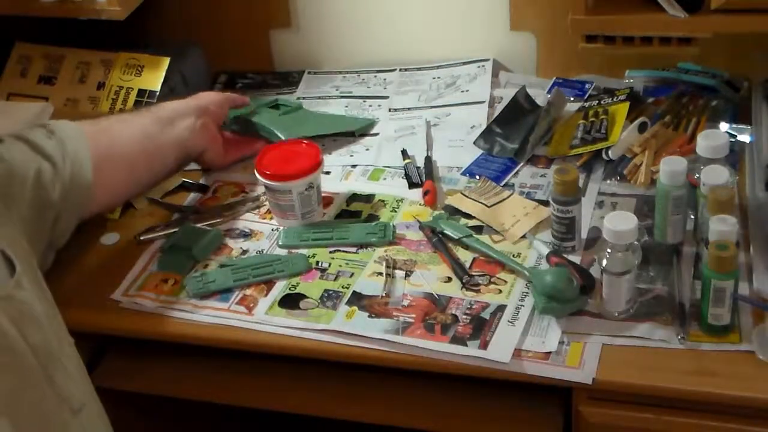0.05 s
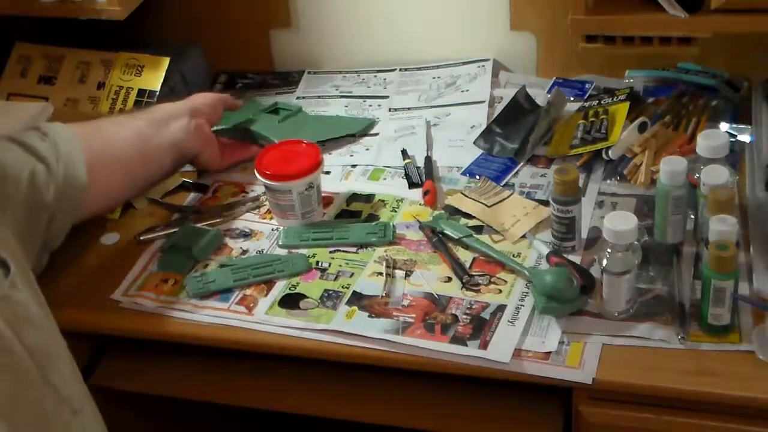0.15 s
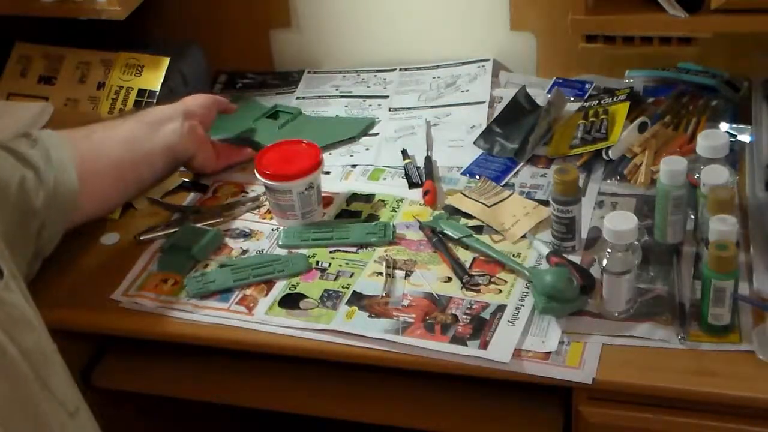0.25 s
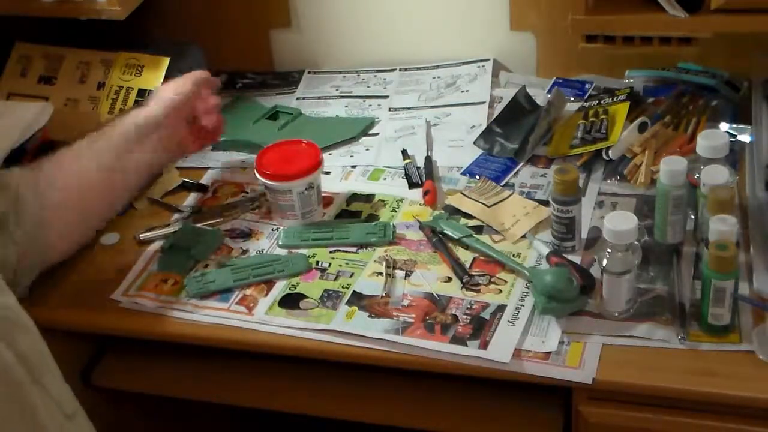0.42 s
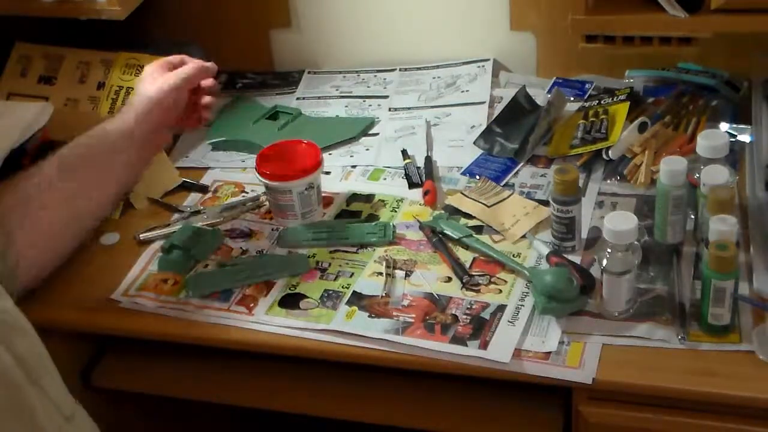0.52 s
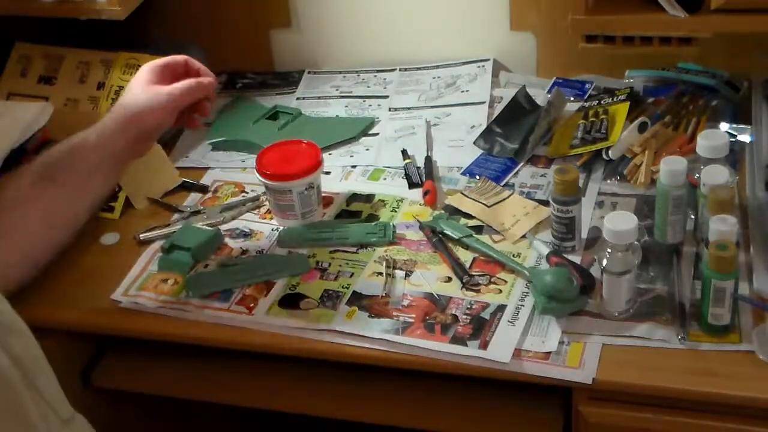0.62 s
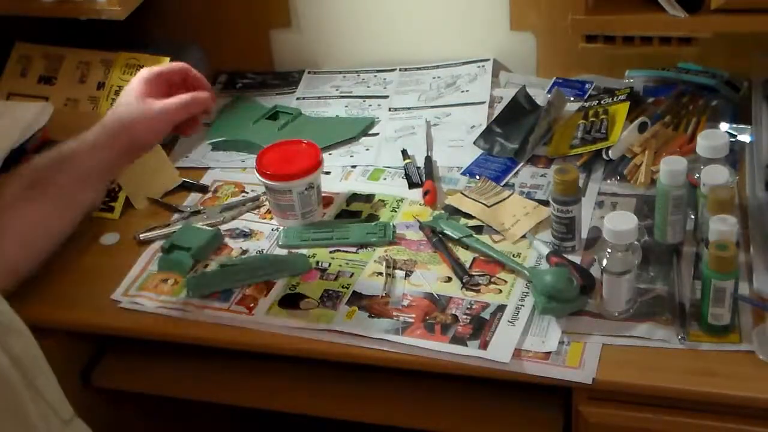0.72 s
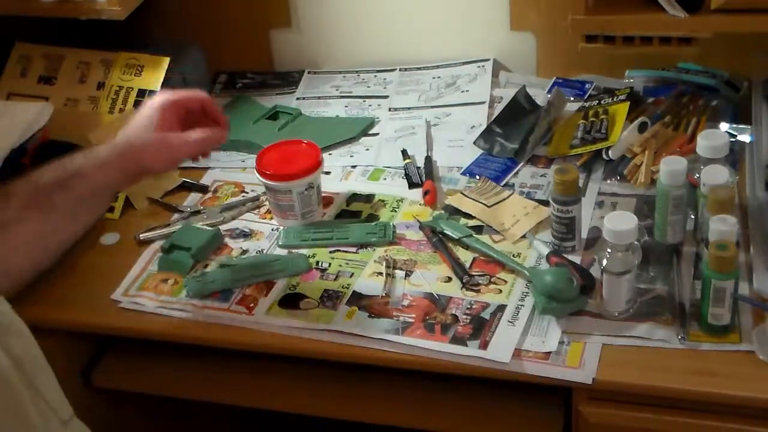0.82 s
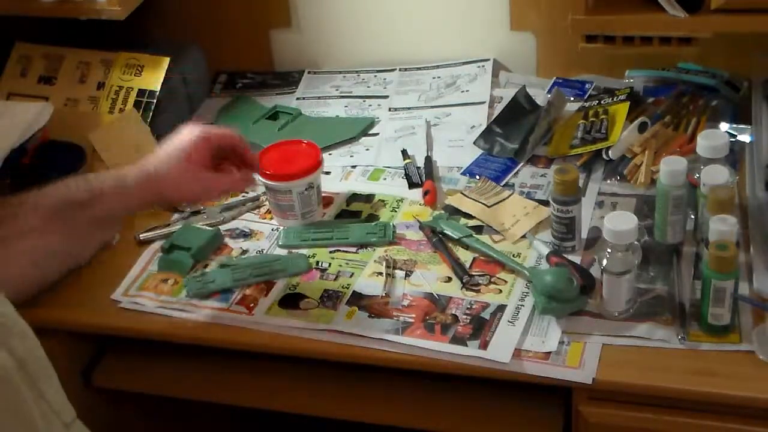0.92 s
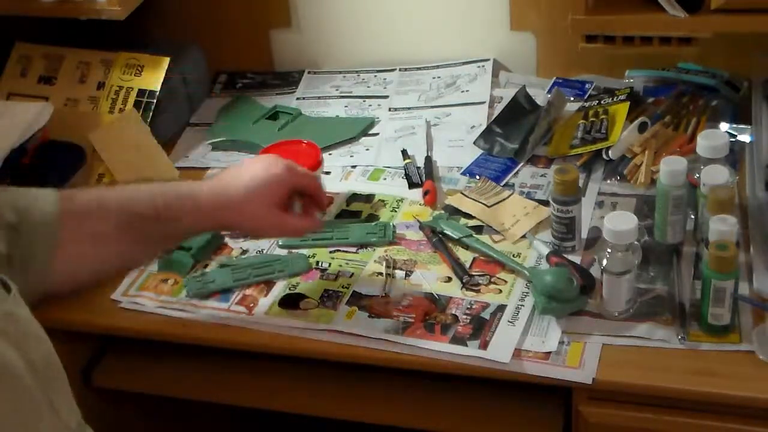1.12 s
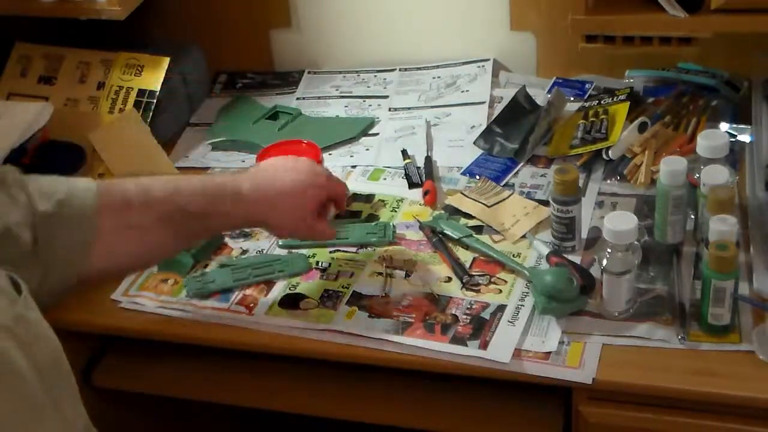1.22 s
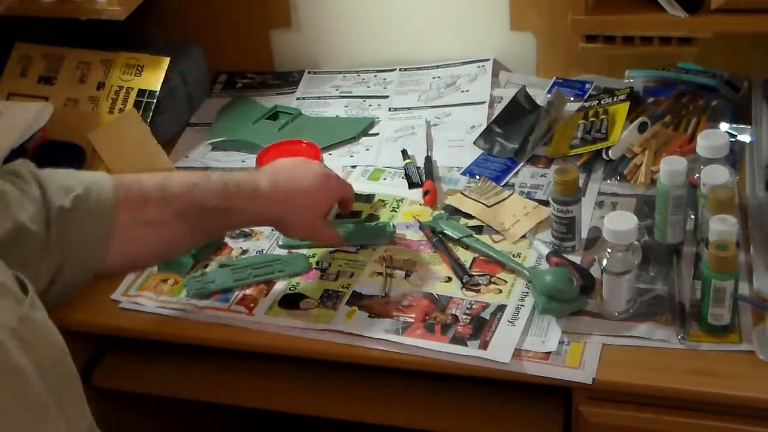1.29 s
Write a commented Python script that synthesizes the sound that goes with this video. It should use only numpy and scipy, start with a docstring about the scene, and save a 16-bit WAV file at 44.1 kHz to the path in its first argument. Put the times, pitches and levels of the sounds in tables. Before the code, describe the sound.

A hollow plastic model hull is set down on a desk, close to the microphones in a small room. Light plastic clicks come from the fingers around 0.1 seconds. At about 0.25 seconds it lands with a sharp knock and a short hollow ring, then rocks in softer bumps and ticks that die away by 0.6 seconds. Only faint room rumble and hiss remain afterwards.

```python
"""Model hull set down on a desk

A small room, a stereo pair of microphones close to a paper-covered desk. A hollow plastic model hull
clicks faintly in the fingers, lands with a sharp knock, rocks to rest in softer bumps and ticks as
the hand lets go. Each blow rings its thin walls and hollow body. The recorder's gain control ducks
the room noise after the knock and lets it back up."""
import sys
import numpy as np
from scipy import signal
from scipy.fft import rfft, irfft
from scipy.io import wavfile

SR = 44100
rng = np.random.default_rng(int(sys.argv[2]) if len(sys.argv) > 2 else 0)


def dump(signal):
    """Clip the signal to [-1, 1] and save it as 16-bit WAV at the path in sys.argv[1]."""
    limited = np.clip(np.atleast_2d(signal).T, -1, 1)
    pcm = np.round(limited * 32767).astype(np.int16)
    wavfile.write(sys.argv[1], SR, pcm)


N = 59535
TOP_HZ = 14300  # upper edge of the recorder's band


# blows of the hull on the desk; a lower cut-off is softer (time [s], level [dB], cut-off [Hz])
DESK_BLOWS = [(0.2405, -7.5, 5620), (0.2422, -9, 4440), (0.2438, -2, 1035), (0.3015, -8, 2350),
              (0.3038, -14.5, 1490), (0.3098, -14, 1404), (0.3457, -8.5, 1580), (0.3580, -11.5, 1170),
              (0.3710, -22.5, 940), (0.3990, -15.5, 1120), (0.4260, -19.5, 1070), (0.4340, -20, 1220),
              (0.4530, -18, 1320), (0.6000, -35, 1300)]
def hull():
    """The hull lands and rocks, close to the microphones: returns its body's ring and its walls' clack."""
    modes = body_ring()
    return strike(DESK_BLOWS, lambda: modes), strike(DESK_BLOWS, wall_clack)


# dense, short-lived ringing of the thin walls (frequency [Hz], relative level [dB], t60 [s])
WALL_BANDS = [(62.26, -8, .15), (142, -18, 0.14), (285, -11.5, 0.11), (468, -4.5, 0.065), (699, 3.5, 0.024),
              (920, 12.5, 0.11), (1380, -11.5, 0.043), (1810, 5, 0.029), (2500, 4.5, 0.087),
              (3170, 0, 0.022), (4140, -2, 0.05), (5100, -12.5, 0.077), (9200, -15.5, 0.047),
              (14000, -13.5, .03)]
def wall_clack(gain_db=15.5):
    """The thin walls clack differently at each point of contact."""
    return undb(gain_db) * dense_ring(WALL_BANDS)


# modes of the hull on the desk (frequency [Hz], relative level [dB], t60 [s])
BODY_MODES = [(139, -22.5, 0.16), (259.6, -26, 0.44), (407.8, -10.5, 0.22), (541.6, -12.5, 0.22),
              (596, -23.5, 0.22), (824.5, -4, .18), (930.5, -6.5, .14), (989.4, 1.5, 0.081),
              (1101, -24.5, 0.14), (1202, -19, 0.41), (1266.5, -11.5, 0.16), (1442, -4.5, 0.11),
              (1600, -11, 0.041), (1624, -20, 0.13)]
def body_ring(gain_db=-15.5, rise_s=0.00074):
    """Every blow rings the same modes of the hollow hull and the desk under it."""
    t = np.arange(N // 2) / SR
    ring = np.zeros((1, len(t)))
    for k, (hz, db, t60) in enumerate(BODY_MODES):
        ring += (-1) ** k * undb(db) * np.sin(2 * np.pi * hz * t) * decay(t, t60)
    return undb(gain_db) * ring * (1 - np.exp(-t / rise_s))


# light clicks of plastic under the fingers (time [s], level [dB], cut-off [Hz])
FINGER_CLICKS = [(0.0690, -7.5, 5000), (0.1097, -2, 3500), (0.1248, 2.5, 8550), (0.1290, 0.5, 5660),
                 (0.1497, -2, 6020), (0.1540, 0.5, 4500), (0.3010, 3, 8650), (0.3435, 1.5, 9900),
                 (0.4375, 1.5, 7060), (0.4590, -3.5, 7000), (0.4850, -4, 6700), (0.5325, -2.5, 7600)]
# ring of one light click (frequency [Hz], relative level [dB], t60 [s])
CLICK_BANDS = [(278, -6, .05), (675, 3.5, 0.029), (970, 3, 0.037), (1460, -11, 0.15), (2220, 1.5, 0.13),
               (3070, -2, 0.047), (4540, -3, 0.081), (6000, -8, .04), (8200, -13, 0.11), (13900, -13, .035)]
def fingers(gain_db=-12.5):
    """Small bright clicks at close range as the plastic shifts in the hand and settles."""
    return undb(gain_db) * strike(FINGER_CLICKS, lambda: dense_ring(CLICK_BANDS))


# reverberation of the small room (frequency [Hz], relative level [dB], t60 [s])
REVERB_BANDS = [(98, 4, 1), (320, -4, 0.2), (550, 3.5, 0.55), (870, -5.5, 0.464), (1290, 0, 0.61),
                (2300, -4.5, 0.56), (3770, -5, 0.52), (8000, -4.5, 1), (14200, -2, 0.34)]
def room_reverb(sound, gain_db=0.5, build_s=0.0085):
    """Reflections build up quickly at the microphones behind the direct sound."""
    response = dense_ring(REVERB_BANDS, size=32768)
    t = np.arange(response.shape[1]) / SR
    build = 1 - np.exp(-(t / build_s) ** 2)
    mono = sound.mean(axis=0, keepdims=True)
    return undb(gain_db) * signal.fftconvolve(mono, build * response, axes=1)[:, :N]


# steady room noise and microphone hiss (frequency [Hz], relative mid [dB], relative side [dB])
NOISE_SPECTRUM = [(11.7, -10, -32), (27.8, 2, -9), (49.4, -9, -14), (84, -15, -30), (144, -12.5, -22),
                  (325, -15, -28), (480, -20.5, -29.5), (1080, -23.5, -32), (1870, -31.5, -35.5),
                  (4120, -36.5, -37.5), (8200, -40.5, -40), (14100, -42.5, -43)]
def room_noise(gain_db=-24):
    """Low room rumble shared by both microphones under their wide, faint hiss."""
    hz = np.fft.rfftfreq(N, 1 / SR)
    mid = irfft(rfft(rng.standard_normal(N)) * undb(along(hz, NOISE_SPECTRUM, column=1)), N)
    side = irfft(rfft(rng.standard_normal(N)) * undb(along(hz, NOISE_SPECTRUM, column=2)), N)
    return undb(gain_db) * left_right(mid, side)


def strike(contacts, ring):
    """Each contact sets off ring(); a softer contact has less treble."""
    out = np.zeros((2, N))
    for start_s, db, cut_hz in contacts:
        first = int(start_s * SR)
        softness = signal.butter(2, min(cut_hz, TOP_HZ), fs=SR, output="sos")
        sound = signal.sosfilt(softness, ring())[:, :N - first]
        out[:, first:first + sound.shape[1]] += undb(db) * sound
    return out


def dense_ring(bands, size=8192, unrelated_hz=10700):
    """Countless overlapping modes in stereo: noise bands, each with its own level and decay."""
    t, hz = np.arange(size) / SR, np.fft.rfftfreq(size, 1 / SR)
    mid, side = np.exp(2j * np.pi * rng.random((2, len(hz))))
    width = np.minimum(hz / unrelated_hz, 1)  # at 1 the two close microphones hear unrelated sound
    spectrum = left_right(mid, side * width)
    out, edges = 0, np.geomspace(45, 16000, 21)
    for lo, hi in zip(edges, edges[1:]):
        centre = np.sqrt(lo * hi)
        db, t60 = along(centre, bands, column=1), along(centre, bands, column=2)
        band = irfft(spectrum * ((hz >= lo) & (hz < hi)), size) * decay(t, t60)
        share = 2 * (hi - lo) / SR
        energy = np.sum(band.mean(axis=0) ** 2)
        out = out + band * undb(db) * np.sqrt(share / energy)
    return out


def along(hz, table, column):
    """One column of a spectrum table, read on a log-frequency axis."""
    rows = np.array(table, float)
    return np.interp(np.log(hz + 1e-3), np.log(rows[:, 0]), rows[:, column])


def decay(t, t60):
    """A ring's envelope, falling 60 dB in t60 seconds."""
    return np.exp(-np.log(1000) * t / t60)


def left_right(mid, side):
    """Mid and side to the left and right channels."""
    return mid + side * np.array([[1], [-1]])


def undb(db):
    """Decibels to gain."""
    return 10 ** (np.asarray(db) / 20)


def scene():
    """At the microphones: hull and fingers up close, the room and its steady noise behind."""
    noise = room_noise()
    body, walls = hull()
    clatter = walls + fingers()
    # the body's ring is heard mostly direct, with less room reverberation than the clatter
    reverb_send = clatter + undb(-7.5) * body
    return body + clatter + room_reverb(reverb_send) + noise


def record(dry):
    """A loud sound turns the recorder's gain down for a while; the top is cut steeply."""
    threshold_db, depth_db = -24, 4
    attack_s, hold_s, release_s = 0.014, 0.37, 0.14
    t = np.arange(N) / SR
    loud = np.abs(dry).max(axis=0) > undb(threshold_db)
    since_loud = t - np.maximum.accumulate(np.where(loud, t, -np.inf))
    duck = np.clip(1 - (since_loud - hold_s) / release_s, 0, 1)
    pole = np.exp(-1 / (attack_s * SR))
    gain = undb(-depth_db * signal.lfilter([1 - pole], [1, -pole], duck))
    top_cut = signal.ellip(10, .2, 70, TOP_HZ, fs=SR, output="sos")
    return signal.sosfilt(top_cut, dry * gain)


dry = scene()
out = record(dry)
dump(out)
```